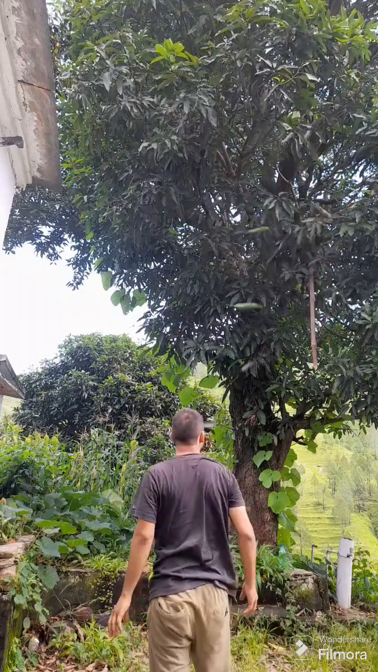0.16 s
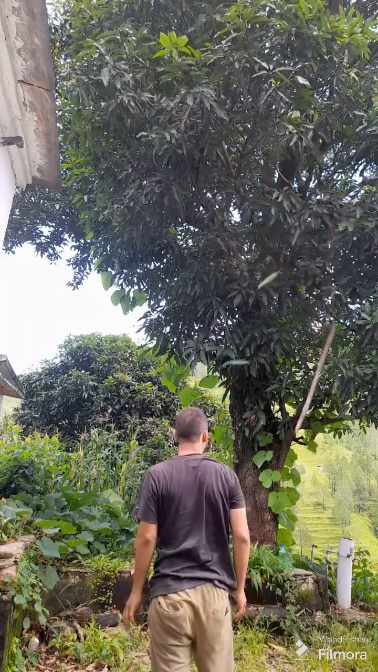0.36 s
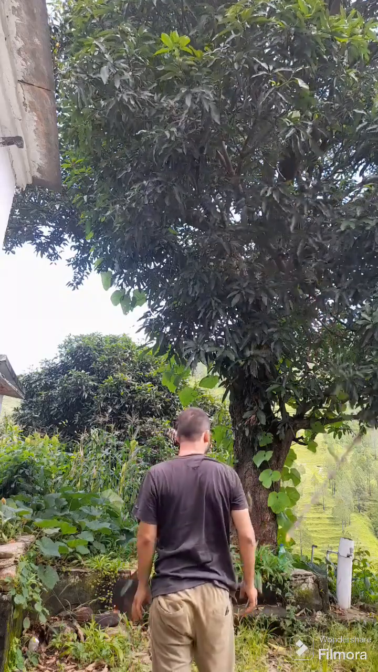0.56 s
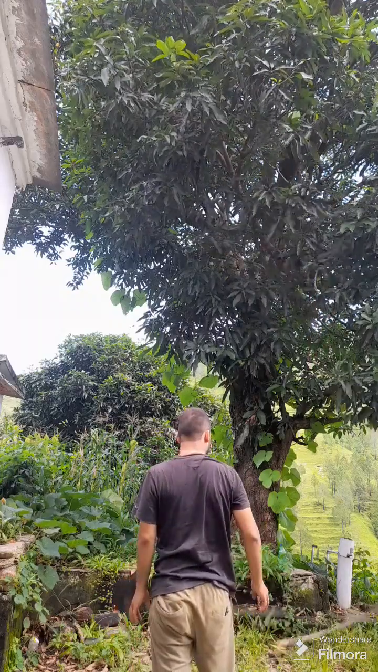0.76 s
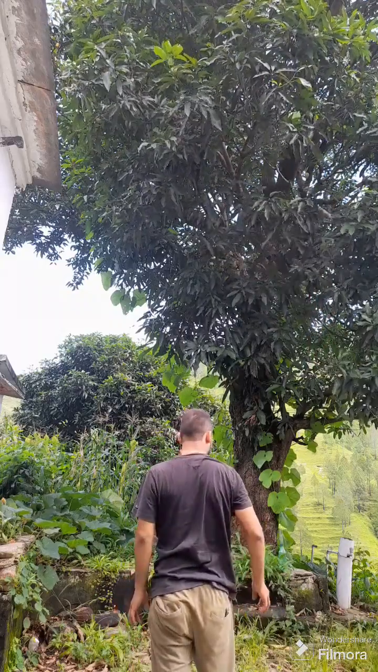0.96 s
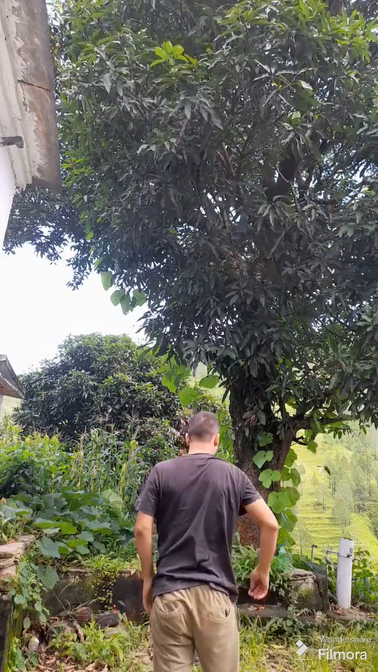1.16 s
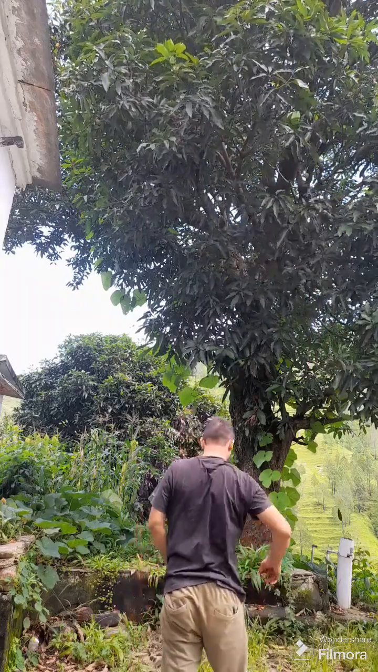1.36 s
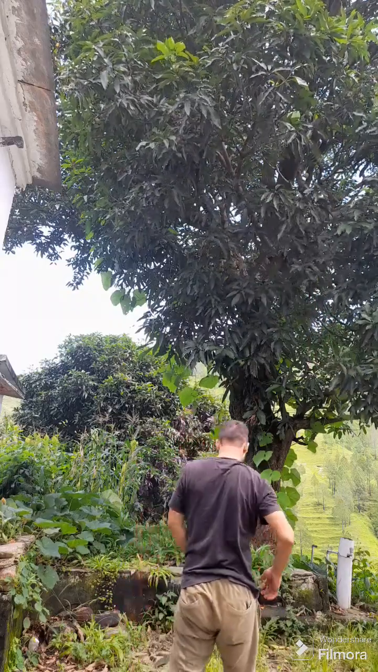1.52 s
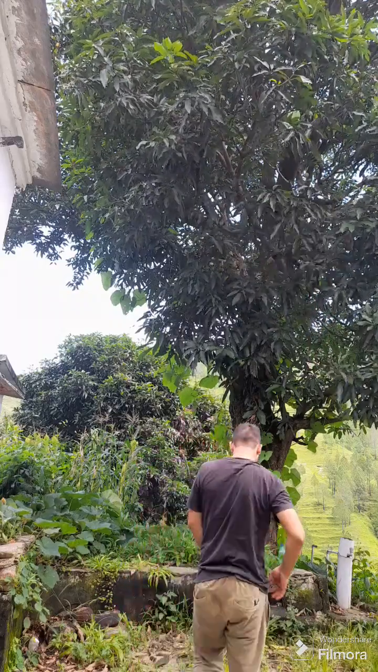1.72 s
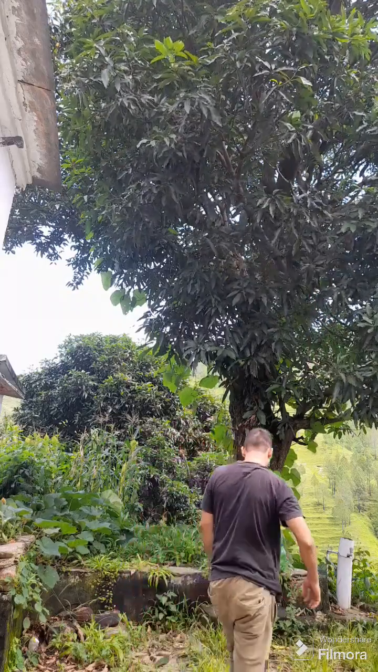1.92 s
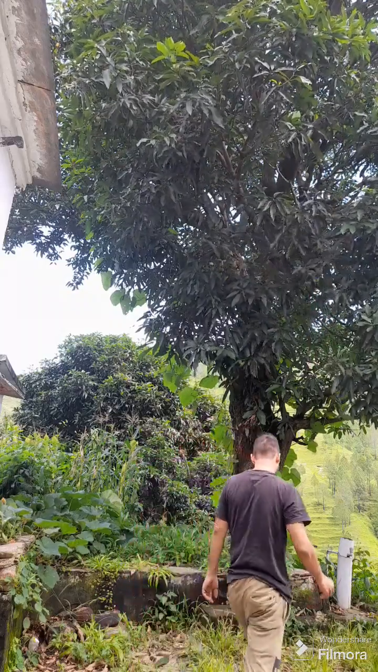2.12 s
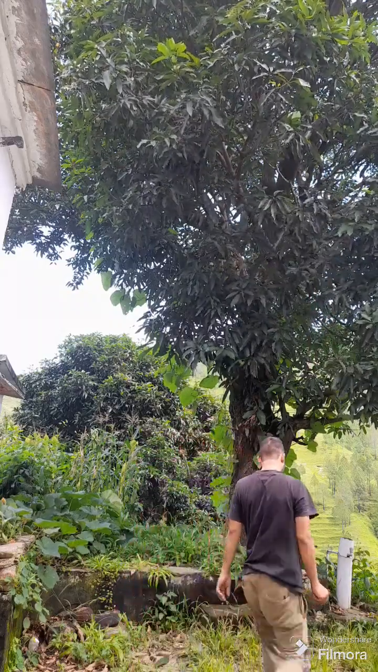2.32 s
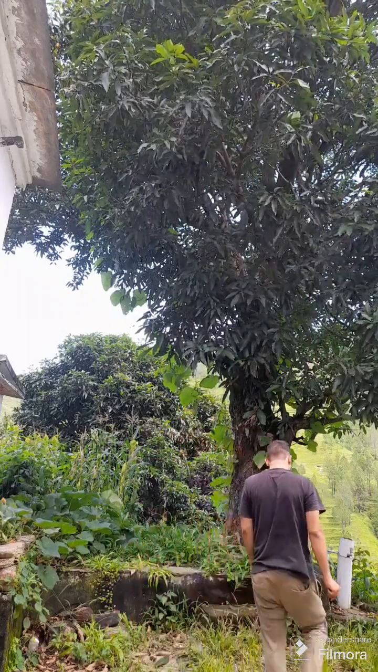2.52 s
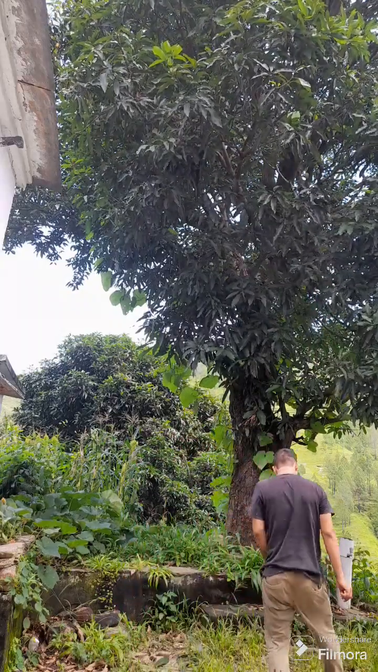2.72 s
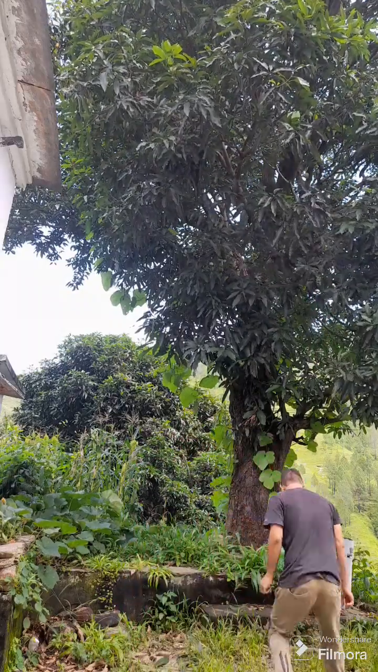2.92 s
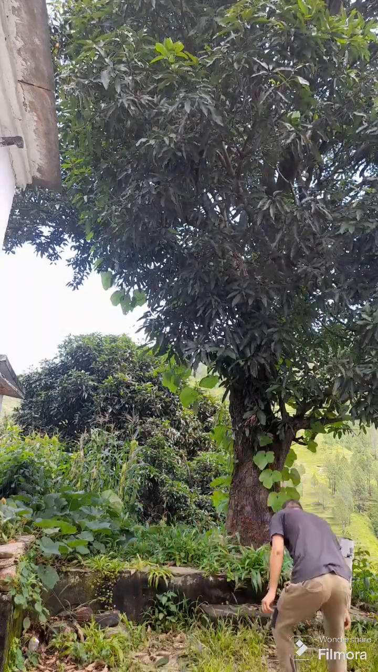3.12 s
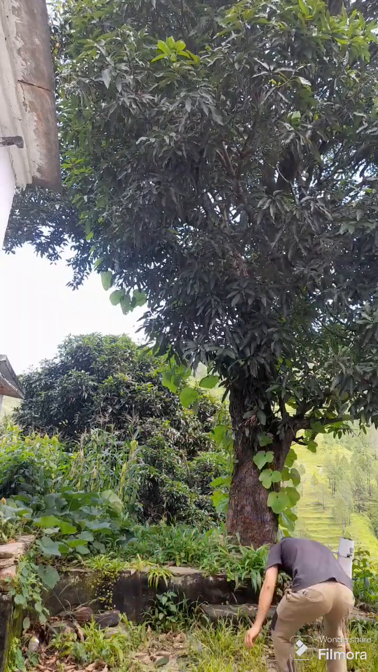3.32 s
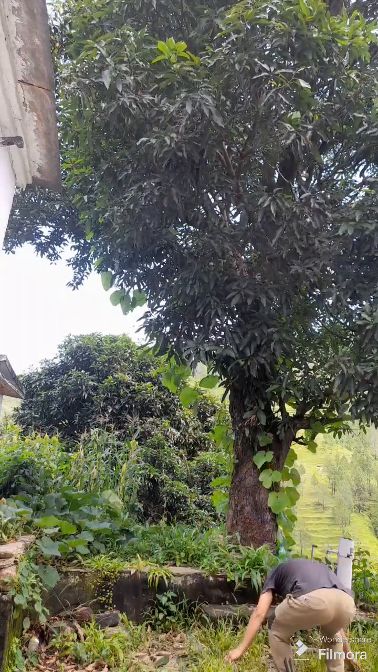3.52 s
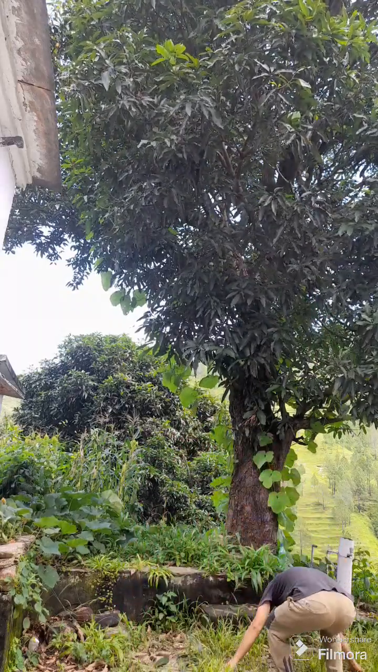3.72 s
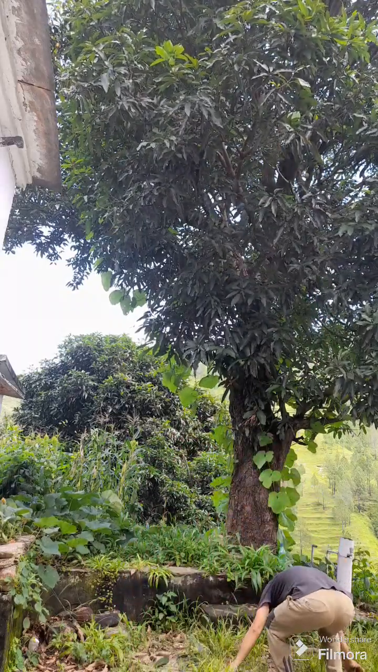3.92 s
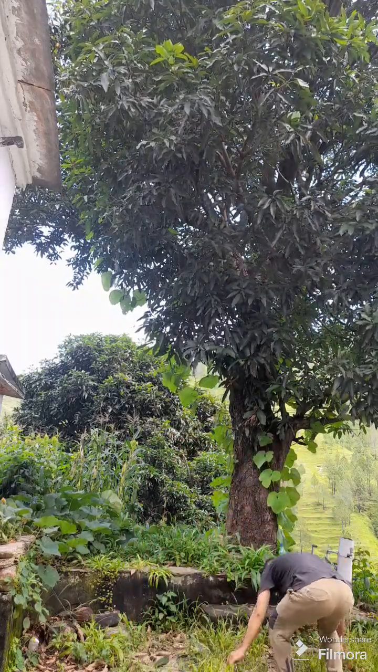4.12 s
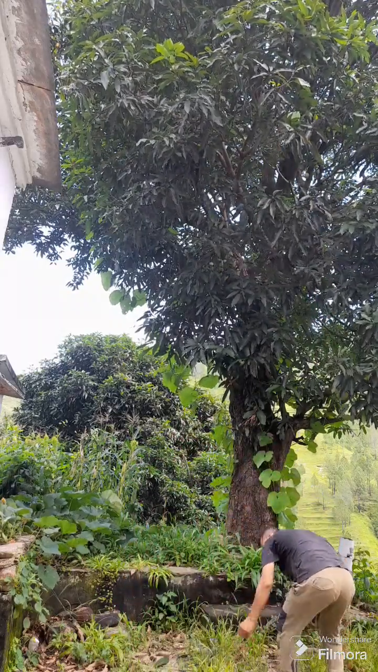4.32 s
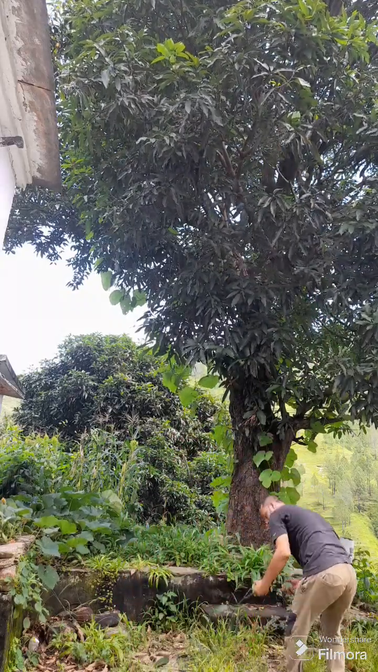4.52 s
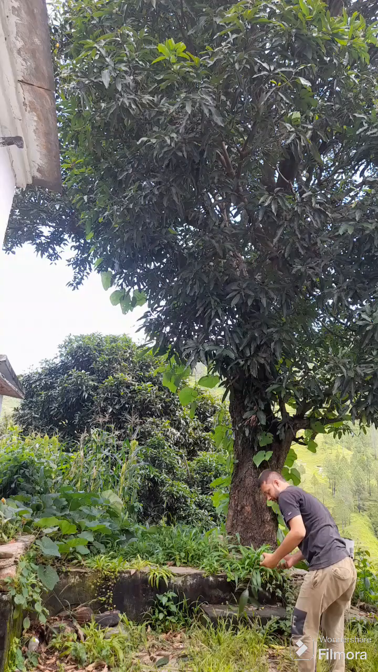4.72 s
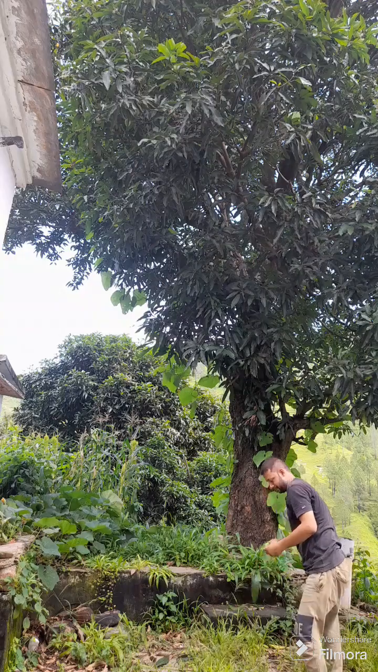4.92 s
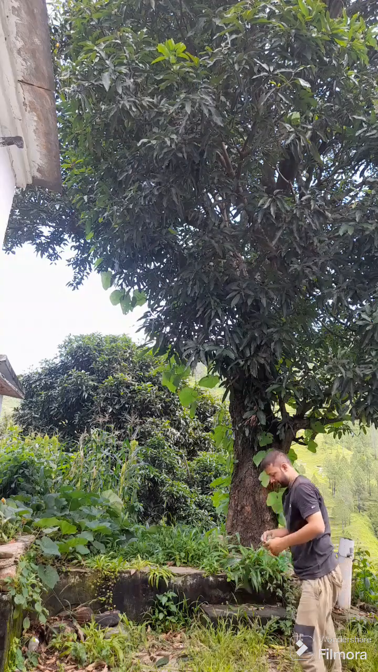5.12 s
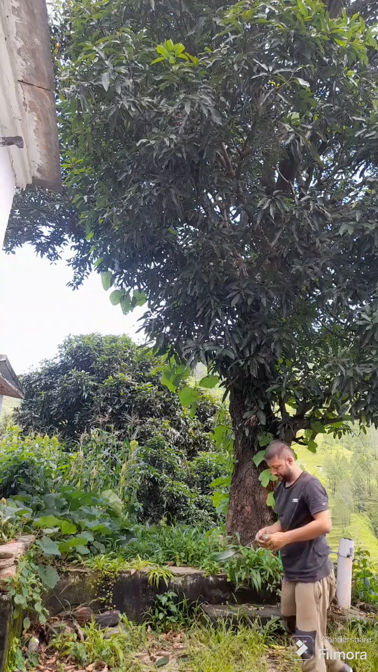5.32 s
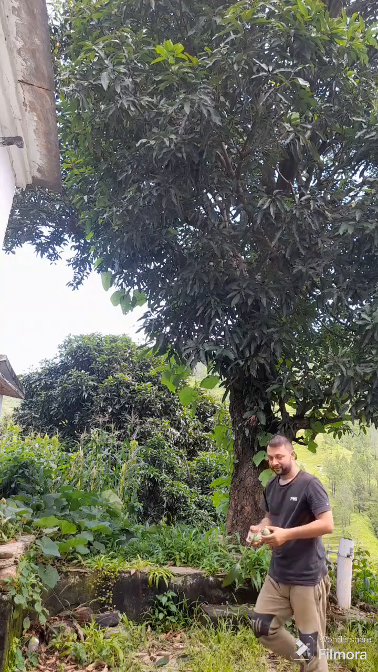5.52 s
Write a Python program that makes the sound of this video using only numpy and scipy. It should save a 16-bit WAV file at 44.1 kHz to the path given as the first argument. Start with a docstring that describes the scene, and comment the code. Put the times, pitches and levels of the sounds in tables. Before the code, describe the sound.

In a hushed garden, falling stick and fruit brush and crackle down through foliage, hitting limbs and soil; the loudest blow is close and wooden, with a quick chatter. Small bits drop afterwards, near silence follows, then grassy footsteps, a crisp crunch, and soft hand rustling. Insects swell faintly and a distant bird calls. Small close stereo microphones, short outdoor echo.

```python
"""Leaves hiss and twigs crack first, as a thrown stick and loose mangoes crash down through a leafy tree.
They thud to the ground, one blow hard and close; a few late pieces drop into dry leaves, then a man walks
through the grass and picks up the fruit. Insects and a far bird sound over the quiet garden, whose walls echo.
Shaped noise and tiny ringing taps make the leaves, decaying noise and tones the blows, ringing modes the stick,
narrow sliding bands the far calls; two close, small microphone ports hear it all."""
import sys
import numpy as np
from scipy import signal
from scipy.fft import rfft, irfft, next_fast_len
from scipy.io import wavfile
from scipy.ndimage import uniform_filter1d

SR = 44100
rng = np.random.default_rng(int(sys.argv[2]) if len(sys.argv) > 2 else 0)


def master(y):
    """Save y as 16-bit WAV."""
    cut = np.clip(np.atleast_2d(y).T, -1, 1)
    pcm = np.round(cut * 32767)  # scale
    wavfile.write(sys.argv[1], SR, pcm.astype(np.int16))


N = 249782

# Relative spectra of still air, lightly brushed grass, trodden grass, tree leaves and snapping stalks:
# pitch_hz [Hz], density_db [dB per Hz]
AIR_SPECTRUM = [(15, -40.5), (25, -0.5), (153, -5), (229, -1.5), (384, -8), (531, -7), (1840, -10),
                (3620, -6), (5140, -3.5), (8360, -15), (9840, -14), (12200, -19), (14000, -15.5),
                (16000, -30.5)]
BRUSHED_GRASS_SPECTRUM = [(120, -17), (200, -15.5), (473, -10), (590, -8), (1250, -8.5), (1350, -6),
                          (2020, -8.5), (2560, -6), (3900, -3), (6170, -6), (8740, -14.5), (9930, -9),
                          (11300, -13), (14600, -11.5), (16000, -16)]
TRODDEN_GRASS_SPECTRUM = [(88, -46), (150, -16.5), (286, -11), (484, -6.5), (534, -5.5), (941, -6),
                          (1020, -5.5), (1390, -3.5), (1720, -6), (2760, -3), (4240, -1.5), (8560, -10),
                          (9820, -9.5), (15100, -10), (16000, -13)]
LEAF_SPECTRUM = [(47, -47), (80, -13), (194, -9), (441, -2.5), (515, -8), (702, -4), (1250, -6),
                 (1400, -2.5), (1950, -6.5), (2780, -0.5), (5520, -2.5), (8990, -10.5), (14300, -10.5),
                 (16000, -13.5)]
STALK_SPECTRUM = [(100, -13.5), (300, -11.5), (600, -2.5), (1200, -3), (2000, -3.5), (2900, 1.5), (4200, 1),
                  (6000, -4), (8500, -12.5), (10500, -13), (12500, -22), (16000, -13)]
# Swells of insect song and far bird notes:
# start_s [s], length_s [s], relative level_db [dB], pitch_hz [Hz], nominal width_hz [Hz]
INSECT_SWELLS = [(1.86, 0.34, -73.5, 5350, 200), (2.55, 0.3, -68, 5350, 230), (3.3, 0.31, -77, 5400, 260),
                 (3.56, 0.44, -70, 5280, 260), (4.2, 0.4, -70, 5180, 263), (4.85, 0.37, -70, 5335, 268)]
BIRD_NOTES = [(2.71, 0.12, -63, 2510, 171), (2.78, 0.11, -71, 2150, 169.4), (4.5, 0.14, -69, 2560, 130),
              (5.53, 0.195, -71, 2340, 220)]
# Hands part the grass, gather the fruit and lift it:
# start_s [s], hold_s [s], relative level_db [dB], extra treble_db [dB]
HAND_STROKES = [(4.115, 0.15, -65.5, 7), (4.275, .11, -53, 3.5), (4.42, 0.088, -53.5, -1.5),
                (4.55, .12, -64.5, 5), (4.685, 0.0071, -51.5, -3), (4.72, 0.11, -51.5, 4),
                (4.815, 0.027, -45, 3), (4.878, 0.014, -50.5, 6), (4.94, .11, -53.5, 0),
                (5.09, 0.035, -48.5, 1.5), (5.2, .2, -63.5, -0.5), (5.385, 0.026, -55, 0.5),
                (5.55, 0.036, -64, 2.5)]
# Feet swing through the grass and press it down: same columns as the hands
FOOT_STROKES = [(2.08, .1, -77, 11), (2.25, .02, -57, 0.5), (2.328, .01, -49, -1), (2.67, 0.14, -61.5, 4),
                (2.885, 0.031, -53.5, 1), (2.948, 0.017, -42.5, -1.5), (3.05, 0.017, -41, -0.5),
                (3.18, .02, -52.5, 3), (3.245, 0.0085, -35, -4)]
# Falling stick and fruit brush through sprays of leaves: same columns as the hands
FALL_STROKES = [(.008, .4, -37, 2), (.06, 0.019, -40.5, 6.5), (.2, 0.13, -40, -3), (.46, 0.059, -38, 3.5),
                (.548, 0.0086, -30, -0.5), (.607, .008, -26.5, 5), (.7, .09, -41, -3),
                (.806, 0.027, -27.5, -3.5), (.88, 0.059, -34.5, 3.5), (.98, 0.0041, -31, -4.5),
                (1.05, 0.11, -54.5, 1), (1.145, 0.15, -50.5, 1), (1.283, 0.0064, -46.5, -25),
                (1.33, 0.31, -58, 1)]
# Crisp strikes on twigs and dry leaves: start_s [s], relative level_db [dB], t60_s [s], ring_hz [Hz]
TWIG_STRIKES = [(.062, -36.5, 0.18, 1400), (.407, -31.5, .033, 2400), (0.445, -31, 0.074, 4100),
                (.527, -30, 0.16, 2970), (.548, -28, 0.4, 3570), (.604, -25, .12, 4800),
                (.885, -21.5, .15, 3940), (.976, -32.5, 0.11, 1310), (1.277, -44.5, 0.16, 2400),
                (1.438, -43, 0.26, 11000), (1.516, -38.5, 0.21, 4840), (2.301, -51, 0.077, 4490),
                (2.627, -52, 0.1, 4000), (3.055, -43, .1, 1400), (3.2213, -31, 0.072, 10000),
                (3.249, -34, 0.087, 2820), (3.559, -59, 0.085, 13070), (3.815, -60.5, 0.16, 11070),
                (3.895, -58.5, .1, 12000), (4.062, -54, 0.086, 10000), (4.411, -50.5, 0.11, 3360),
                (4.684, -42.5, 0.092, 3640), (4.882, -40.5, 0.15, 5650), (4.959, -45.5, 0.088, 10500),
                (5.08, -46, 0.08, 2900)]
# Dull blows on limbs and soil: start_s [s], relative level_db [dB], centre_hz [Hz]
DULL_BLOWS = [(.059, -40, 533), (.083, -47, 152), (.253, -36, 188), (.301, -37, 197), (.456, -39.5, 264.6),
              (.542, -38.5, 296), (.614, -37.5, 230), (.721, -36, 420), (.815, -25.5, 314),
              (.824, -24.5, 210), (.8865, -14, 235), (.922, -30.5, 325), (.977, -35, 230),
              (1.326, -53.5, 455), (1.442, -44.5, 508), (1.548, -54, 336), (3.221, -40, 1176),
              (3.247, -42, 475)]
# The stick lands and chatters: start_s [s], relative level_db [dB], contact_ms [ms]
STICK_CONTACTS = [(0.887, -22, .4), (0.8903, -20, .6), (0.8957, -25, .4), (0.8988, -27, .6),
                  (0.9085, -33, .5)]
# Bending modes of the stick: pitch_hz [Hz], relative level_db [dB], t60_s [s]
STICK_MODES = [(335, -16, 0.14), (501, 0.5, 0.037), (552, 1, 0.048), (806.4, -6, .06), (892, -5, 0.061),
               (1268, -7, .05), (2712, -8, 0.094), (2800, -10, 0.11), (3770, -9.5, 0.08), (4060, -10, 0.08),
               (4985, -19.5, 0.079)]
# Decay of the garden's echo: pitch_hz [Hz], t60_s [s]
ECHO_DECAY = [(60, .42), (200, .32), (350, .28), (700, .38), (4000, .48), (16000, .4)]
# Likeness of the two microphone ports: pitch_hz [Hz], likeness [no unit, limited to 0..1 in use]
PORT_LIKENESS = [(30, -0.55), (250, 1.5), (600, 0.6), (1100, 1.63), (2500, -0.4), (6000, 0.28),
                 (9000, -1.5)]
# Left port against right port: pitch_hz [Hz], left_minus_right_db [dB]
PORT_BALANCE = [(50, -6.5), (250, -4.5), (600, -3), (1300, -0.5), (2500, 1), (5000, -1.4), (9000, -5),
                (14000, -10)]


def gain_of(db):
    """Decibels to an amplitude factor."""
    return 10 ** (np.asarray(db) / 20)


def evened(x):
    """Scales a sound to rms 1."""
    return x / np.sqrt(np.mean(x ** 2) + 1e-20)


def read(points, hz):
    """Reads a table over log frequency."""
    table_hz, value = np.transpose(points)
    return np.interp(np.log(hz + 1), np.log(table_hz + 1), value)


def add(mix, start_s, sound):
    """Lays a sound into the mix at its start time."""
    part = mix[..., max(round(start_s * SR), 0):][..., :sound.shape[-1]]
    part += sound[..., :part.shape[-1]]


def colour(x, db_at):
    """Filters by a rule giving dB at each frequency, then scales to rms 1."""
    size = next_fast_len(x.shape[-1] + 1024)
    hz = np.fft.rfftfreq(size, 1 / SR) + 1
    filtered = irfft(rfft(x, size) * gain_of(db_at(hz)), size)
    return evened(filtered[..., :x.shape[-1]])


def wander(size, per_s):
    """Slow chance: random knots, per_s of them each second, joined by straight lines."""
    knots = rng.standard_normal(2000)
    return np.interp(np.arange(size) / SR * per_s, np.arange(2000), knots)


def air(level_db):
    """The garden's steady hush is shaped noise, swelling very slightly with the breeze."""
    breeze = gain_of(.4 * wander(N, per_s=7))
    hush = colour(rng.standard_normal((2, N)), lambda hz: read(AIR_SPECTRUM, hz))
    return gain_of(level_db) * breeze * hush


def far_calls(calls, glide):
    """Distant calls, blurred by the trees into narrow bands that swell and slide in pitch."""
    out = np.zeros((2, N))
    for start_s, length_s, level_db, pitch_hz, width_hz in calls:
        t = np.arange(int(length_s * SR)) / SR
        noise = rng.standard_normal((2, SR))
        blur = colour(noise, lambda hz: -20 * np.log10(1 + (hz / width_hz * 0.9) ** 3))[:, :len(t)]
        sliding_hz = pitch_hz * (1 + glide * (t / length_s - .5))
        carrier = np.sin(2 * np.pi * np.cumsum(sliding_hz) / SR)
        swell = signal.windows.tukey(len(t), .7)
        add(out, start_s, 2 * gain_of(level_db) * blur * carrier * swell)
    return out


def insects():
    """Swells of insect song: narrow bands that slide upward."""
    return far_calls(INSECT_SWELLS, glide=0.055)


def bird():
    """Far bird notes: narrow bands that slide downward."""
    return far_calls(BIRD_NOTES, glide=-0.081)


def shimmer(x, depth_db):
    """Each leaf has its own ring, so the colour changes in short, narrow patches."""
    z = signal.stft(x, nperseg=512, noverlap=384)[2]
    field = rng.standard_normal(z.shape[1:])
    patches = evened(uniform_filter1d(uniform_filter1d(field, size=9, axis=1), size=4, axis=0))
    broad = evened(uniform_filter1d(uniform_filter1d(field[::-1], size=7, axis=1), size=30, axis=0))
    coloured = z * gain_of(depth_db * (patches + 0.51 * broad))
    return evened(signal.istft(coloured, nperseg=512, noverlap=384)[1][:, :x.shape[1]])


def crackle(per_s, spread_db, clump_db):
    """Clumps of tiny leaf contacts of uneven size, each a few cycles at its own pitch."""
    size_db = spread_db * np.minimum(rng.exponential(1, N), 4.5) + clump_db * wander(N, per_s=130)
    clicks = gain_of(size_db) * (rng.random(N) < per_s / SR)
    pitches = np.geomspace(500, 15000, 16)
    leaf = rng.integers(0, len(pitches), N)
    out = np.zeros((2, N))
    for k, pitch_hz in enumerate(pitches):
        cycles = np.arange(400) * pitch_hz / SR
        ring = np.exp(-cycles / 0.75) * np.sin(2 * np.pi * (cycles + rng.random((2, 1))))
        out += signal.oaconvolve((clicks * (leaf == k))[None], pitch_hz * ring, axes=1)[:, :N]
    return evened(out)


def rustle(strokes, rise_db_per_s, fade_db_per_s, spectrum, per_s, spread_db, clump_db):
    """Leaves tap and slide on each other; each stroke swells, holds and dies, with its own treble."""
    t = np.arange(N) / SR
    power, treble_power = np.zeros((2, N))
    for start_s, hold_s, level_db, treble_db in strokes:
        rise_db = rise_db_per_s * np.clip(start_s - t, 0, 1)
        fade_db = fade_db_per_s * np.clip(t - start_s - hold_s, 0, 1)
        stroke = gain_of(level_db - rise_db - fade_db) ** 2
        power += stroke
        treble_power += stroke * gain_of(treble_db) ** 2
    taps = crackle(per_s, spread_db, clump_db)
    sliding = rng.standard_normal((2, N))  # as strong as the taps
    leaves = colour(shimmer(taps + sliding, depth_db=2.3), lambda hz: read(spectrum, hz))
    treble_filter = signal.butter(2, 7500, "high", fs=SR, output="sos")
    treble = signal.sosfiltfilt(treble_filter, leaves)
    return np.sqrt(power) * (leaves - treble) + np.sqrt(treble_power) * treble


def picking_hands():
    """Hands brush lightly through the blades as they gather the fruit."""
    return rustle(HAND_STROKES, rise_db_per_s=265, fade_db_per_s=220, spectrum=BRUSHED_GRASS_SPECTRUM,
                  per_s=3700, spread_db=0.5, clump_db=-0.5)


def footsteps():
    """Feet swing through the grass and press its blades together."""
    return rustle(FOOT_STROKES, rise_db_per_s=295, fade_db_per_s=225, spectrum=TRODDEN_GRASS_SPECTRUM,
                  per_s=4500, spread_db=1.5, clump_db=2.0)


def falling_foliage():
    """Stick and fruit rub and tap the leaves they brush on the way down."""
    return rustle(FALL_STROKES, rise_db_per_s=699.5, fade_db_per_s=300, spectrum=LEAF_SPECTRUM,
                  per_s=6500, spread_db=1.0, clump_db=1.0)


def snaps(level_db, rise_s, ring_db, ring_octaves):
    """A strike bursts into cracks, strongest where the struck piece rings."""
    out = np.zeros((2, N))
    t = np.arange(SR // 3) / SR
    for start_s, strike_db, t60_s, ring_hz in TWIG_STRIKES:
        # smaller pieces ring higher and crack brighter
        tilt_db_per_octave = 0.86 + 3.1 * np.log2(ring_hz / 3000)

        def crack_db(hz):
            """Stalk colour, tilted, with a peak at the ring."""
            tilt_db = tilt_db_per_octave * np.log2(np.maximum(hz, 500) / 3000)
            peak_db = ring_db * np.exp(-(np.log2(hz / ring_hz) / ring_octaves) ** 2)
            return read(STALK_SPECTRUM, hz) + tilt_db + peak_db

        burst = colour(rng.standard_normal((2, len(t))), crack_db)
        shape = gain_of(strike_db - 60 * t / t60_s) * (1 - np.exp(-t / rise_s))
        add(out, start_s, burst * shape)
    return gain_of(level_db) * out


def thuds(t60_s, rise_s, skirt_db, tone_db):
    """Soft, heavy blows: a short tone inside a puff of noise about the same pitch."""
    out = np.zeros(N)
    t = np.arange(SR // 3) / SR
    shape = gain_of(-60 * t / t60_s) * (1 - np.exp(-t / rise_s))
    shape_rms = np.sqrt(np.mean(shape ** 2))
    for start_s, level_db, centre_hz in DULL_BLOWS:
        noise = rng.standard_normal(len(t))
        puff = colour(noise, lambda hz: -skirt_db * np.log2(1 + 2 * np.log2(hz / centre_hz) ** 2))
        body = puff + gain_of(tone_db) * np.sin(2 * np.pi * centre_hz * t)
        add(out, start_s, gain_of(level_db) * shape_rms * evened(body * shape))
    return out


def ground_push(level_db, push_ms):
    """Each contact of the stick shoves the soil once: a short, deep pressure pulse."""
    out = np.zeros(N)
    u = np.arange(SR // 20) / SR / (push_ms / 1000)  # time in push lengths
    pulse = (1 - u) * np.exp(-u) * (1 - np.exp(-8 * u))
    for start_s, contact_db, _ in STICK_CONTACTS:
        add(out, start_s, gain_of(contact_db + level_db) * pulse)
    return out


def stick(level_db):
    """Each contact rings the bending modes; a longer contact leaves the high ones quiet."""
    out = np.zeros((2, N))
    t = np.arange(SR // 3) / SR
    for pitch_hz, mode_db, t60_s in STICK_MODES:
        start_turn = np.array([[0], [rng.random()]])  # the scattered path arrives at any phase
        ring = gain_of(mode_db - 60 * t / t60_s) * np.cos(2 * np.pi * (pitch_hz * t + start_turn))
        for start_s, contact_db, contact_ms in STICK_CONTACTS:
            softening = np.hypot(1, .5 * pitch_hz * contact_ms / 1000)
            add(out, start_s, gain_of(contact_db + level_db) * ring / softening)
    return out


def garden(x):
    """Walls and trees scatter a short tail, each band dying at its own speed."""
    taps = rng.standard_normal((2, SR // 2)) * (rng.random((2, SR // 2)) < .06)
    hz, t, z = signal.stft(taps, SR, nperseg=256)
    decay = gain_of(-60 * t / read(ECHO_DECAY, hz)[:, None])
    build_up = np.minimum(t / 0.0088, 1)
    tail = signal.istft(z * decay * build_up, SR, nperseg=256)[1]
    return signal.fftconvolve(x, tail / np.linalg.norm(tail[0]), axes=1)[:, :N]


def ports(x):
    """Two close ports share the bass; treble reaches the left one later, with its own balance."""
    size = next_fast_len(N + 1024)
    direct, scattered = rfft(x, size)
    hz = np.fft.rfftfreq(size, 1 / SR)
    likeness = np.clip(read(PORT_LIKENESS, hz), 0, 1)
    side = gain_of(read(PORT_BALANCE, hz) / 2)
    lag_s = .25 / 1000 * hz / np.hypot(hz, 1500)  # nears 0.25 ms in the treble
    left = direct * side * np.exp(-2j * np.pi * hz * lag_s)
    right = (likeness * direct + np.sqrt(1 - likeness ** 2) * scattered) / side
    return irfft(np.array([left, right]), size)[:, :N]


def scene():
    """Fall, landing, footsteps and picking in the garden."""
    distance = air(level_db=-65.5) + insects() + bird()
    twigs = snaps(level_db=4, rise_s=.0013, ring_db=4.5, ring_octaves=0.24)
    leaves = picking_hands() + footsteps() + falling_foliage() + twigs
    blows = thuds(t60_s=.1, rise_s=.0015, skirt_db=6, tone_db=-1.5)
    bass = blows + ground_push(level_db=9, push_ms=.9)
    wood = stick(level_db=1)
    echo = gain_of(-11.0) * garden(leaves) + gain_of(-16.0) * garden(wood + bass)
    # long waves reach both ports alike, the right one 1 dB stronger
    return ports(leaves + wood + echo + distance) + bass * gain_of([[-.5], [.5]])


def record(dry):
    """The small microphones lose the deep bass; a steep low-pass then limits the treble."""
    bass_cut = signal.butter(2, 45, "high", fs=SR, output="sos")
    thin = signal.sosfilt(bass_cut, dry)
    band_limit = signal.firwin(511, 15950, window=("kaiser", 9), fs=SR)  # edge in Hz
    return signal.oaconvolve(thin, band_limit[None], "same")


dry = scene()
out = record(dry)
master(out)
```